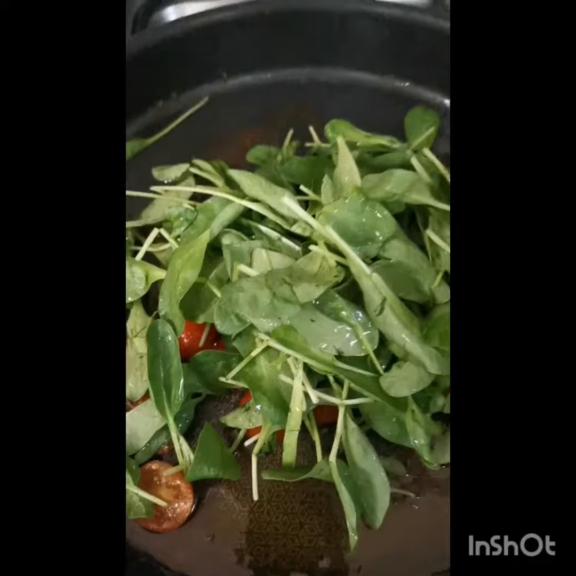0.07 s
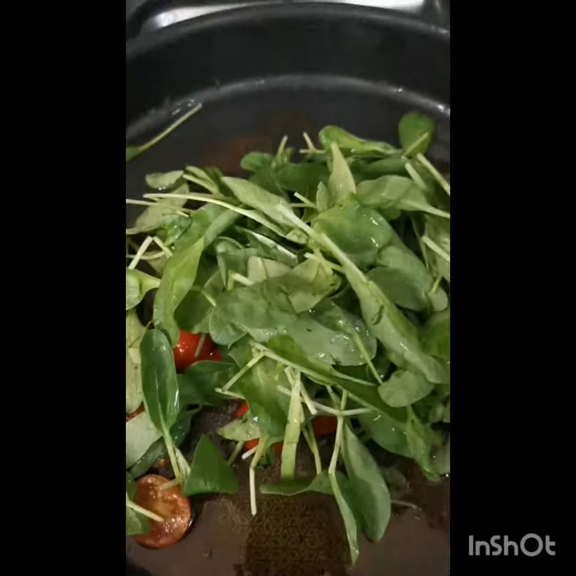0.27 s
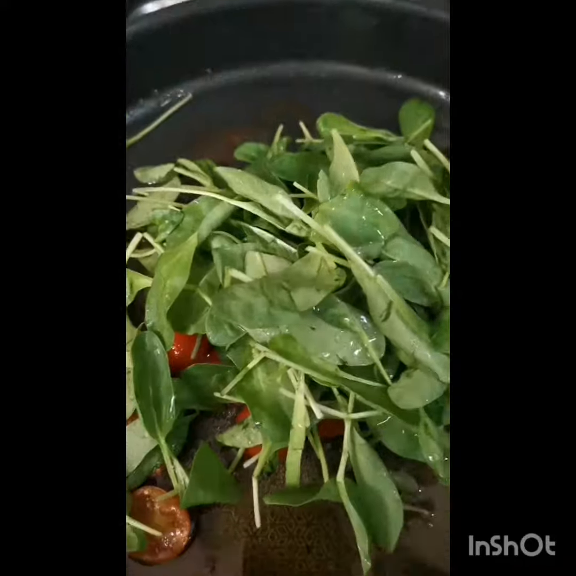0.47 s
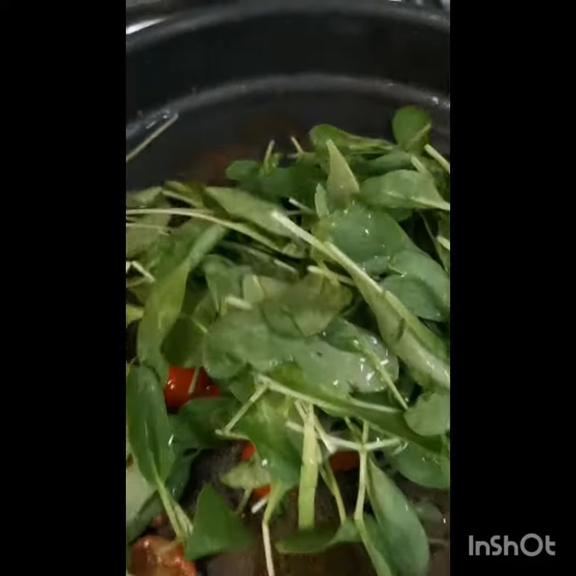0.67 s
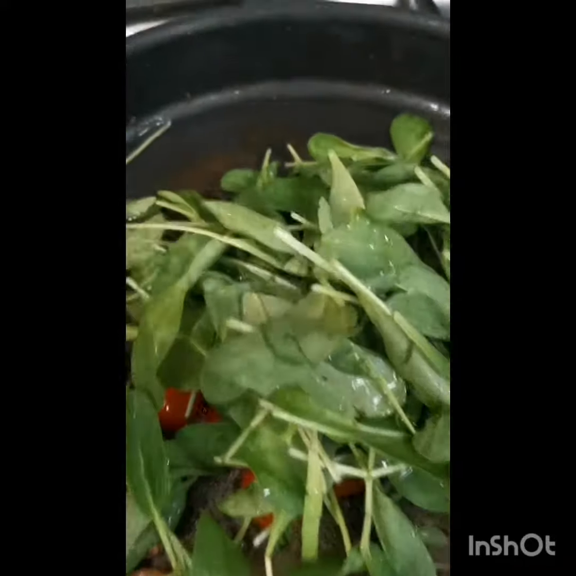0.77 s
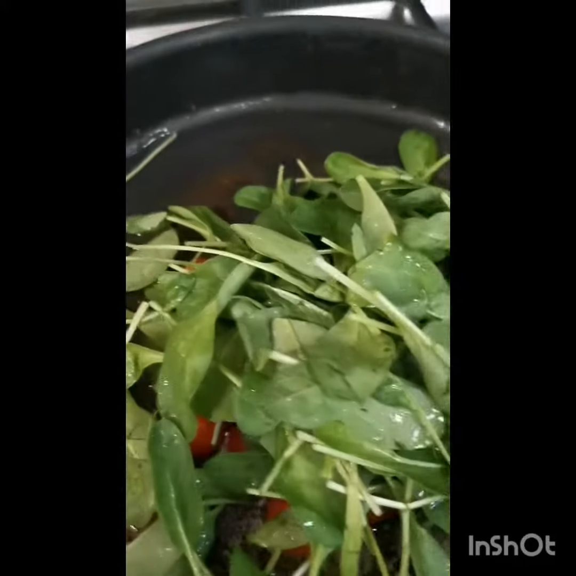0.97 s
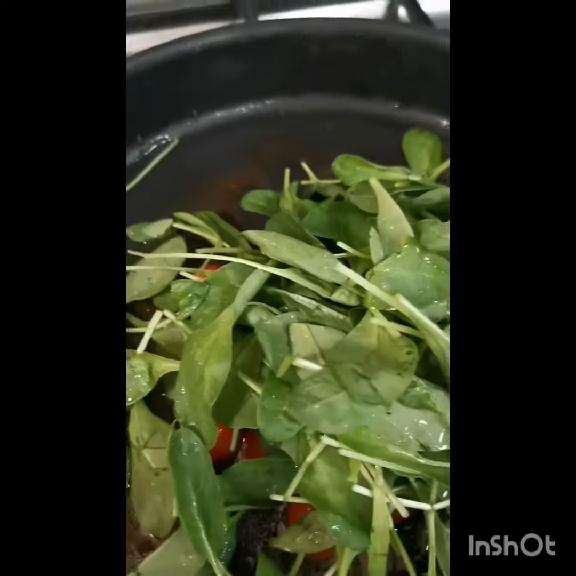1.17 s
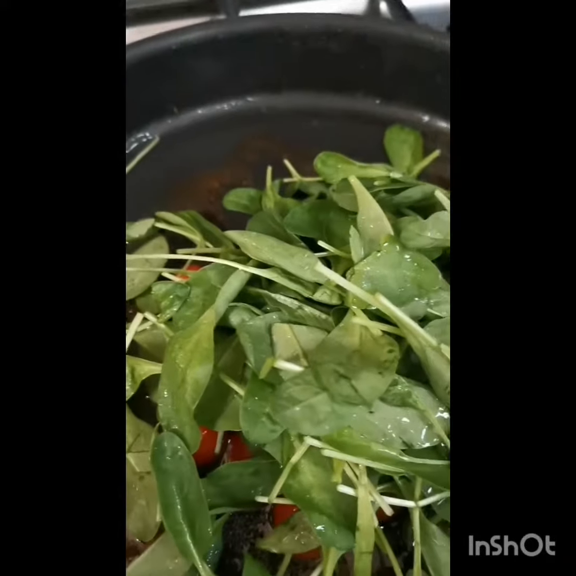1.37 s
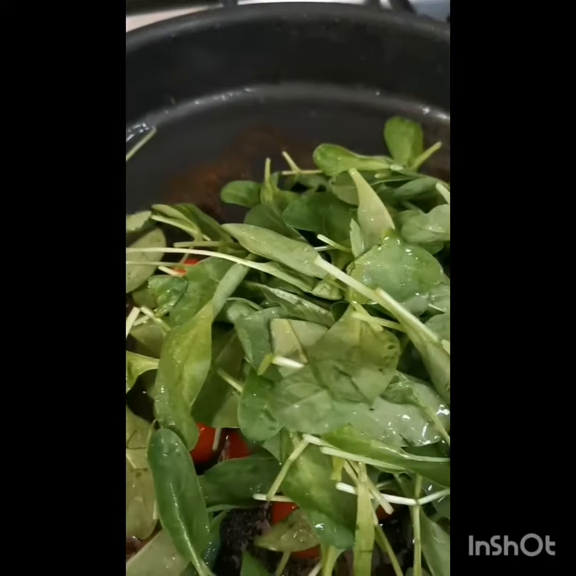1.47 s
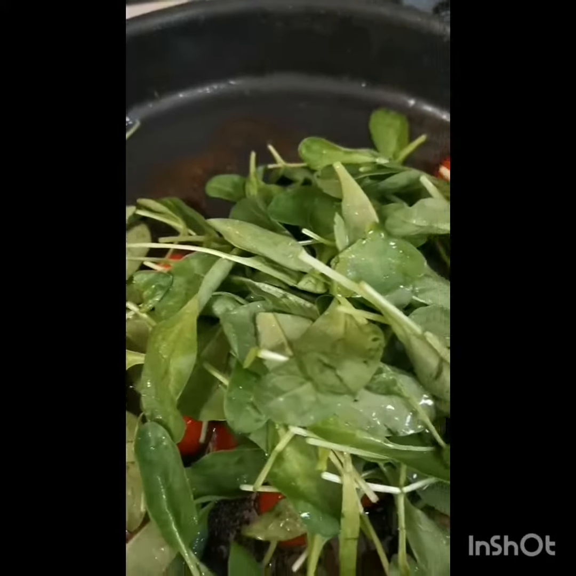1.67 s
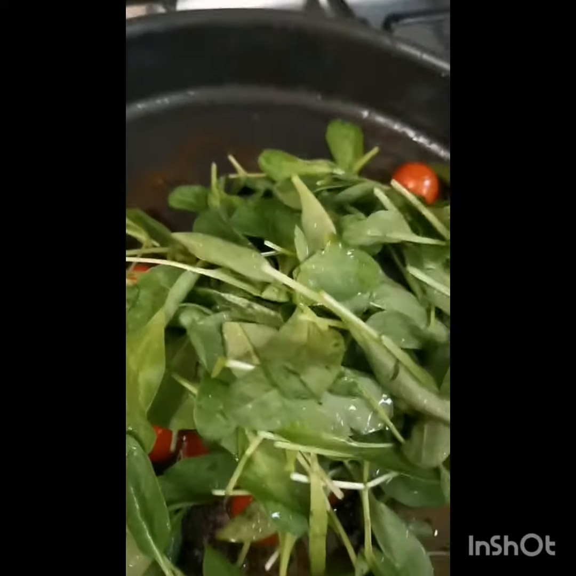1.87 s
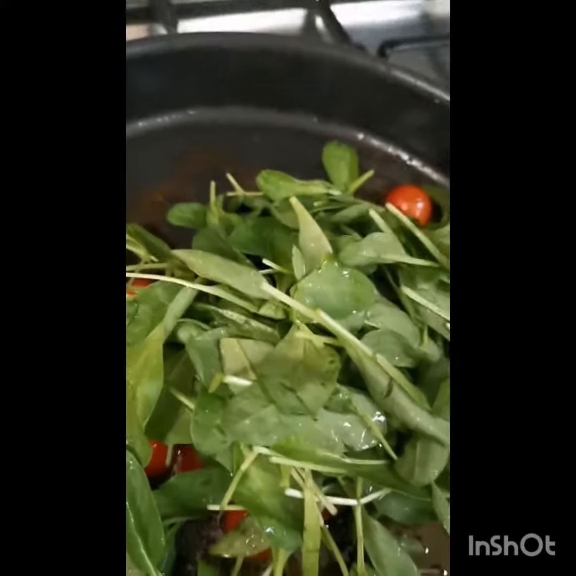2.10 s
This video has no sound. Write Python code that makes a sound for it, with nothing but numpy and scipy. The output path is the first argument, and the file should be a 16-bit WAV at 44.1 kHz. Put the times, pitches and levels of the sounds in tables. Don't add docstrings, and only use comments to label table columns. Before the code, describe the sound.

Leafy greens sizzle gently in a hot pan in a live kitchen; halfway a hard object bangs down and rattles, ringing briefly, then phone taps and creaks close on the right, over a humming cooker hood.

```python
import sys
import numpy as np
from scipy import signal
from scipy.fft import rfft, irfft
from scipy.io import wavfile

SR = 44100
rng = np.random.default_rng(int(sys.argv[2]) if len(sys.argv) > 2 else 0)


def linear_from_db(decibels):
    return 10 ** (np.asarray(decibels, float) / 20)


def digitize_waveform(pressure):
    field = np.atleast_2d(pressure).T
    bounded = np.clip(field, -1, 1)
    quanta = np.round(bounded * 32767).astype(np.int16)
    wavfile.write(sys.argv[1], SR, quanta)


N = 94197
T_S = np.arange(N) / SR


def in_time(rows, column=1):
    points = np.transpose(rows)
    return np.interp(T_S, points[0], points[column])


def at_hz(points, hz):
    f, v = np.transpose(points)
    return np.interp(np.log(hz), np.log(f), v)


def rms_one(x):
    return x / np.sqrt(np.mean(x ** 2) + 1e-20)


def pan(db):
    return linear_from_db(np.array([[.5], [-.5]]) * db)


def drift(rate_hz):
    return np.interp(T_S * rate_hz, np.arange(400), rng.standard_normal(400))


def high_pass(x, hz):
    return signal.sosfilt(signal.butter(2, hz, "high", fs=SR, output="sos"), x)


def band_pass(x, low_hz, high_hz):
    return signal.sosfilt(signal.butter(2, [low_hz, high_hz], "band", fs=SR, output="sos"), x)


def hold(x, keep):
    return signal.lfilter([1], [1, -keep], x)


def ring(clicks, hz, t60_s):
    r, w = linear_from_db(-60 / (t60_s * SR)), 2 * np.pi * hz / SR
    return signal.lfilter([0, np.sin(w)], [1, -2 * r * np.cos(w), r * r], clicks + 1e-18)


def clicks_at(s, gains):
    out = np.zeros(N)
    np.add.at(out, (np.asarray(s) * SR).astype(int), gains)
    return out


def burst(s, length_s):
    t = T_S - s
    return np.clip(t / .001, 0, 1) * np.exp(-np.maximum(t - length_s / 2, 0) / length_s * 2)


def grains(rate_hz, spread_db, shape):
    size = linear_from_db(spread_db * np.minimum(rng.exponential(1, shape), 5)) * rng.choice([-1, 1], shape)
    return rms_one(size * (rng.random(shape) < rate_hz / SR))


# (frequency [Hz], likeness [-1..1])
LIKENESS = [(40, 1), (200, 0.99), (350, 0.95), (600, 0.56), (1500, 0.04), (4000, 0.043), (9000, 0.69)]


def bands(source, gain_at):
    out, edges_hz = 0, 22 * 2 ** np.arange(0, 9.7, .4)
    for k, (low, high) in enumerate(zip(edges_hz, edges_hz[1:])):
        mid, side = band_pass(source[k % 2], low, high)
        hz = np.sqrt(low * high)
        alike = np.clip(at_hz(LIKENESS, hz), -1, 1)
        both = np.sqrt(1 + alike) * mid + np.sqrt(1 - alike) * side * [[1], [-1]]
        out = out + gain_at(hz) * both
    return out


# (time [s], level [dB])
SIZZLE_LEVEL = [(0, -59), (.07, -56.5), (.2, -59), (.28, -55.5), (.42, -59), (.55, -51.5), (.66, -56),
                (.72, -54), (.82, -56), (1.05, -56), (1.7, -60.5), (1.85, -59.5), (1.92, -54.5),
                (2.03, -52.5), (2.135, -70)]
# (frequency [Hz], density [dB per Hz])
SIZZLE_COLOUR = [(600, -9), (900, -5.5), (2100, -7), (2800, -11), (4300, -11), (6200, -11.5), (9000, -19.5),
                 (11000, -15), (16000, -16.5)]


def sizzle():
    pops = grains(1200, 6, (2, N))
    source = rng.standard_normal((2, 2, N)) + linear_from_db(-24) * pops

    def gain(hz):
        return linear_from_db(at_hz(SIZZLE_COLOUR, hz) + 0.91 * drift(14.7)) * (hz > 600)

    return linear_from_db(in_time(SIZZLE_LEVEL) - 3.0) * rms_one(bands(source, gain))


# (time [s], level [dB], length [s])
SPITS = [
    (0.095, -65, 0.00071),
    (0.11, -54, 0.0043),
    (0.116, -62.5, 0.0063),
    (0.126, -68, 0.003),
]


def spits():
    hiss = band_pass(rng.standard_normal(N), 9100, 15500)
    force = sum(linear_from_db(db) * burst(s, length_s) for s, db, length_s in SPITS)
    return hiss * force * pan(17)


BLOW_S = [1.0635, 1.067, 1.076, 1.105, 1.1345, 1.172, 1.214, 1.237, 1.254, 1.3425, 1.352, 1.377, 1.394,
          1.4522, 1.456, 1.463, 1.469]
# (clatter [dB], thud [dB], knock [dB], length [s])
BLOWS = [(-25.5, -8, -17, 0.0044), (-9, -9, -7, 0.0073), (-24, -40, -23, 0.012), (-21, -26.5, -31, 0.017),
         (-33, -15, -12, 0.0061), (-31, -20.5, -31, 0.012), (-32, -27, -25, 0.0077),
         (-35, -23, -26.5, 0.0049), (-34.5, -33.5, -28.5, 0.0088), (-30, -36.5, -43, 0.0071),
         (-34, -34.5, -34.5, 0.014), (-35, -32.5, -33, 0.0081), (-39, -36, -40, 0.0078),
         (-24, -31, -24, 0.0012), (-37, -29.5, -37, 0.0064), (-45, -42.5, -39, 0.0042),
         (-47, -34.5, -34, 0.0061)]
# (frequency [Hz], density [dB per Hz])
CLATTER_COLOUR = [(600, -18), (1200, -1), (1700, -0.5), (2500, -2.5), (3300, -4.5), (4100, -1.5),
                  (5000, -6.5), (16000, -14.5)]
# (frequency [Hz], level [dB], t60 [s], left-right [dB])
BODY = [(94, -13, 0.1, 2), (189, -31, 0.044, 8), (255.5, -2, 0.039, 0), (387, -8.5, 0.04, -4),
        (512, 0, 0.035, -7), (634, -4, 0.04, 4.5), (850, -28, 0.005, -2), (1091, 1, 0.016, 5.5),
        (1217, -4.5, 0.013, 1.5), (1547, -8.5, 0.012, -9), (2030, -14, 0.024, 18), (2355, -1.5, .015, 1),
        (2607, -5.5, 0.017, 7)]


def blows():
    bursts = np.array([burst(s, row[3]) for s, row in zip(BLOW_S, BLOWS)])
    bright, low, high = linear_from_db(np.transpose(BLOWS)[:3]) @ bursts
    noise = rng.standard_normal((2, 2, N))
    clatter = bright * rms_one(bands(noise, lambda hz: linear_from_db(at_hz(CLATTER_COLOUR, hz)) * (hz > 600)))
    thud = 0
    for hz, db, t60_s, pan_db in BODY:
        force = high if hz > 700 else low
        contacts = force * grains(2100, 3.58, (2, N))
        mid, side = high_pass(ring(contacts, hz, t60_s), hz / 2)
        width = 0.61 * np.sqrt(1 - np.clip(at_hz(LIKENESS, hz), 0, 1))
        thud = thud + linear_from_db(db - 22.5) * pan(pan_db) * (mid + width * side * [[1], [-1]])
    return clatter * pan(3), thud


# (frequency [Hz], t60 [s])
ROOM_T60 = [(100, 0.32), (500, 0.59), (2000, 0.85), (6000, 0.64), (13000, 0.11)]


def kitchen(x):
    noise = rng.standard_normal((2, 2, N))
    tail = bands(noise, lambda hz: linear_from_db(-60 * T_S / at_hz(ROOM_T60, hz)))
    tail = tail * np.clip(T_S / 0.0028, 0, 1)
    tail = tail / np.sqrt(np.sum(tail ** 2) / 2)
    return signal.fftconvolve(tail, x.mean(0)[None])[:, :N]


# (frequency [Hz], width [Hz], level [dB], t60 [s])
FADING = [
    (2620, 150, -49.5, 0.31),
    (3950, 650, -54.5, 0.64),
    (5240, 950, -57, .2),
    (7450, 3500, -57, 0.27),
]


def fading():
    out = 0
    for hz, width_hz, db, t60_s in FADING:
        noise = rng.standard_normal(N) + rng.standard_normal((2, N))
        out = out + linear_from_db(db - 60 * T_S / t60_s) * rms_one(ring(noise, hz, 2.7 / width_hz))
    return out


# (time [s], level [dB], gap [s], slips [count])
CREAKS = [
    (1.9648, -18, .0066, 2),
    (1.9818, -15, .0027, 3),
    (1.9892, -17, .0013, 2),
    (1.9923, -16, .0023, 2),
    (1.9984, -19, .002, 1),
    (2.0824, -15, .0016, 4),
    (2.0918, -15, .0018, 2),
]
# (frequency [Hz], level [dB])
CASE = [(600, -29), (1300, -30), (2400, -0.5), (4800, -6.5), (6800, -4), (8800, 1), (11500, -7),
        (14500, -16)]


def creaks():
    runs = [(s + gap_s * k, db) for s, db, gap_s, count in CREAKS for k in range(int(count))]
    s, db = np.transpose(runs)
    slips = clicks_at(s, linear_from_db(-2 + db + rng.normal(0, 1.0, len(s))))
    held = linear_from_db(-19) * hold(slips, .982) + linear_from_db(-42) * hold(slips, 0.99)
    rasp = held * rng.standard_normal(N)
    near = high_pass(sum(linear_from_db(db) * ring(rasp - slips, hz, .0017) for hz, db in CASE), 510)
    far = linear_from_db(-26) * (ring(near, 4140, 0.017) * 0.27 + .5 * near)
    return np.array([far, near])


# (time [s], dull [dB], tick [dB], left-right [dB])
TAPS = [(0.102, -48, -32, 21), (0.112, -44, -34, 17), (1.8548, -35, -40, -19.5), (1.8987, -37.5, -32, 0),
        (1.9029, -34.5, -36.5, -18.5), (1.9379, -37.5, -71, -21.5), (1.943, -36.5, -38, -20),
        (1.958, -38.5, -50, -1), (2.0358, -38.5, -35.5, -22), (2.047, -39.5, -51, -24),
        (2.071, -46, -61, -22), (2.076, -40.5, -56, -23), (2.108, -45, -46, -7), (2.1123, -38, -47, -22),
        (2.121, -35, -35, -13)]
# (time [s], level [dB], left-right [dB])
GRIP = [(0, -48, 11), (.08, -60, 12), (.1, -43, 19.5), (.22, -43.5, 18), (.26, -55, 11), (.4, -47.5, -4),
        (.72, -64, -1), (.8, -40.5, -1), (.9, -45.5, 2), (1.03, -62, 6), (1.2, -48, 3), (1.36, -41, -1.5),
        (1.48, -39, 3), (1.54, -51, 2), (1.95, -56, -24), (2.135, -64, 3)]


def hand():
    s, dull_db, tick_db, pan_db = np.transpose(TAPS)
    rough, taps = rng.standard_normal(N), []
    for gain in pan(pan_db):
        dull = clicks_at(s, linear_from_db(dull_db) * gain)
        tick = clicks_at(s, linear_from_db(tick_db) * gain)
        tick = tick + .12 * hold(tick, .985) * rough
        knock = ring(dull, 905, .003) + linear_from_db(-2.5) * ring(dull, 293, .012)
        taps.append(high_pass(knock, 127) + high_pass(ring(tick, 3900, .0005), 1500))
    noise = rng.standard_normal(N) + 0.32 * rng.standard_normal((2, N))
    rumble = rms_one(band_pass(noise, 25, 105))
    return np.array(taps) + rumble * linear_from_db(in_time(GRIP) - 6.5) * pan(in_time(GRIP, 2))


# (frequency [Hz], density [dB per Hz])
AIR_COLOUR = [(15, -36), (25, -10), (119, -2), (135, -6.5), (151, -14), (243, -9), (413, -11), (554, -17.5),
              (2000, -40.5), (2600, -57), (4400, -120)]
# (frequency [Hz], level [dB], width [Hz])
HUM = [
    (118.4, -59, 12),
    (237, -63, 18),
    (2649, -76, 20),
    (2708, -74, 20),
    (2767, -74, 20),
    (2945, -75, 18),
    (15106, -68, 70),
]
# (time [s], level [dB])
DRAUGHT = [(0, -7), (.3, -1), (.6, 0.5), (.85, 1), (1.0, 3.5), (1.6, -8), (1.9, -0.5), (2.05, 0.5),
           (2.1, -1), (2.135, 1)]


def hood():
    noise = rng.standard_normal((2, 2, N))
    air = bands(noise, lambda hz: linear_from_db(at_hz(AIR_COLOUR, hz) + 1.5 * drift(8.02)) * (hz < 2200))
    tones = 0
    for hz, db, width_hz in HUM:
        level_db = db + 6.0 + (hz > 2000) * in_time(DRAUGHT) + 4 * drift(16.0)
        phase = 2 * np.pi * np.cumsum(hz + width_hz * drift(30.7)) / SR
        tones = tones + linear_from_db(level_db) * np.sin(phase)
    left, right = linear_from_db(-52.5) * rms_one(air) + tones
    return np.array([np.interp(np.arange(N) - 0.00031 * SR, np.arange(N), left), right])


# (frequency [Hz], width [Hz], level [dB])
WHISTLES = [
    (2740, 320, -70),
    (5360, 110, -85),
    (5771, 80, -83),
    (7714, 200, -79),
]


def whistles():
    out = 0
    for hz, width_hz, db in WHISTLES:
        level = linear_from_db(db + in_time(DRAUGHT) + 4 * drift(6.9))
        noise = rng.standard_normal(N) + .6 * rng.standard_normal((2, N))
        once = ring(noise, hz, 3.2 / width_hz)
        out = out + level * rms_one(ring(once, hz, 3.2 / width_hz))
    return out


TOP_LEAK_DB = -18


def scene():
    clatter, thud = blows()
    room = linear_from_db(-4) * kitchen(clatter + linear_from_db(-4) * thud)
    pan_food = sizzle() + spits() * linear_from_db(-TOP_LEAK_DB / 2)
    return pan_food + clatter + thud + room + fading() + creaks() + hand() + hood() + whistles()


def band_limit(x):
    return signal.sosfilt(signal.butter(12, 16490, fs=SR, output="sos"), x)


def record(dry):
    knee_db, squeeze, release_db_per_s, attack_s = -21, 0.31, 81.5, 0.0007
    hz = np.fft.rfftfreq(N, 1 / SR)
    port = linear_from_db(7 / (1 + ((hz - 7820) / 800) ** 2))
    top = linear_from_db(TOP_LEAK_DB) + 1 / (1 + (hz / 9100) ** 20)
    mic = irfft(rfft(dry) * port * top / (1 + (hz / 15500) ** 80), N)
    over_db = np.maximum(20 * np.log10(np.abs(mic).max(0) + 1e-9) - knee_db, 0)
    ramp_db = release_db_per_s * T_S
    held_db = np.maximum.accumulate(over_db + ramp_db) - ramp_db
    r = np.exp(-1 / (attack_s * SR))
    duck_db = squeeze * signal.lfilter([1 - r], [1, -r], held_db)
    return band_limit(mic * linear_from_db(-duck_db))


dry = scene()
out = record(dry)
digitize_waveform(out)
```